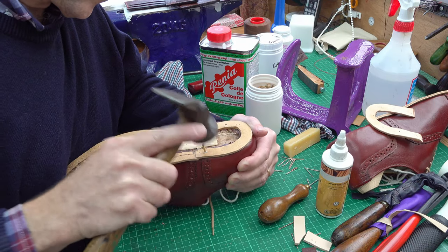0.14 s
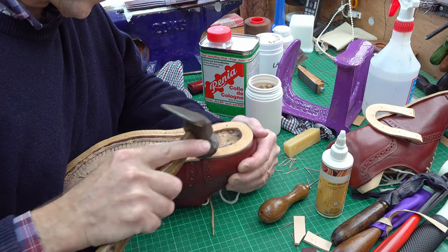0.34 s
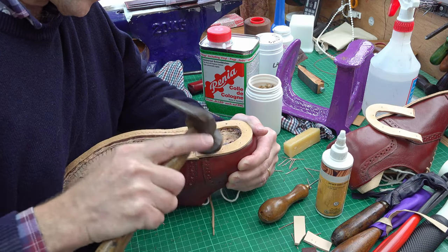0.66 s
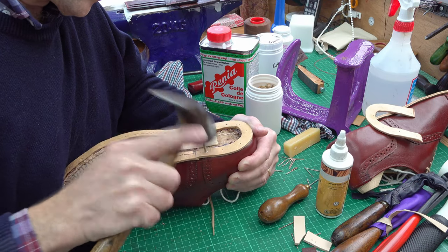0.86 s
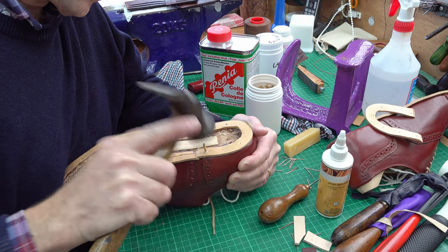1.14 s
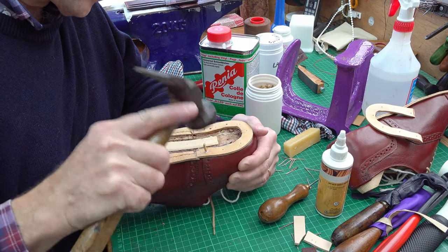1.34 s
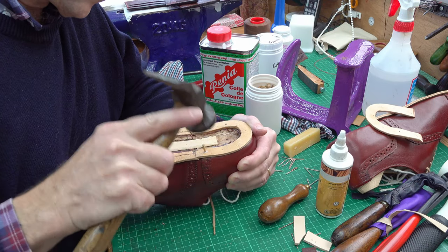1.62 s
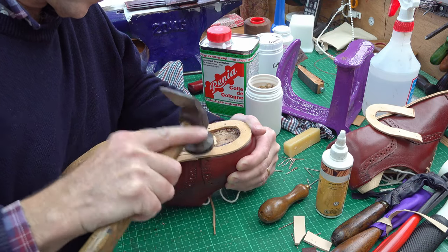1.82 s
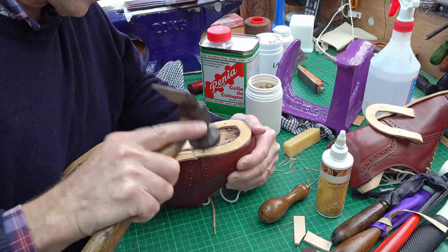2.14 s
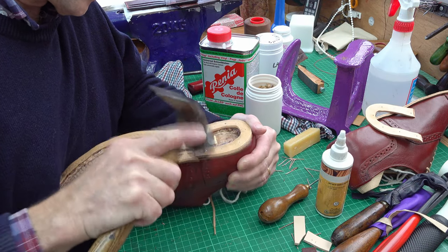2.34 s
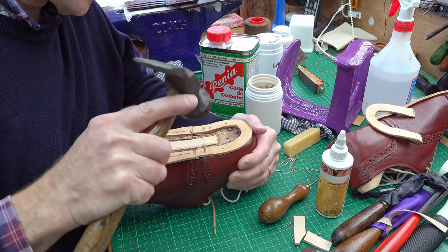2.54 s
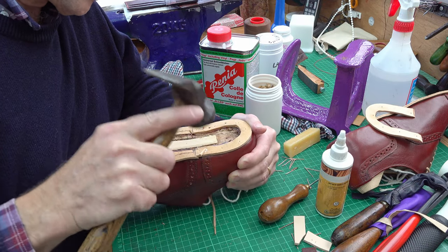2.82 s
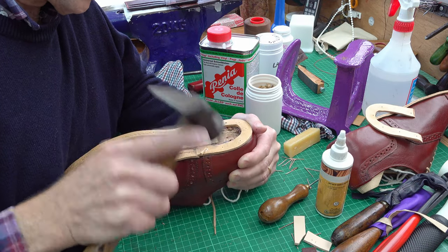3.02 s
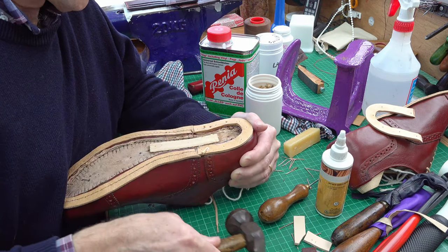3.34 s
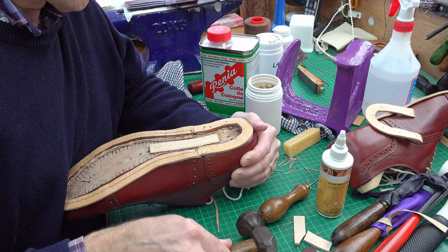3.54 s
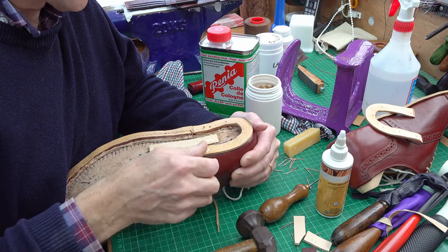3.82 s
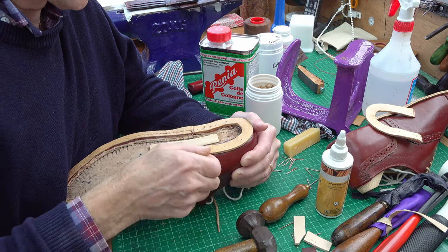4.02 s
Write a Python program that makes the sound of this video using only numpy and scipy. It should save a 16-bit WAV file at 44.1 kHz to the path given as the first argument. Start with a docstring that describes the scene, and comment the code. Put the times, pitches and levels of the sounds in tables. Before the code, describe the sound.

A small hammer taps a wooden peg ten times in steady rhythm, then the hammer is set down with a clattering knock in a quiet workshop.

```python
"""A low rumble and faint hiss, then a cobbler's hammer taps a wooden peg ten times into a shoe sole on a workbench.
Each blow is a filtered impulse (crack) with damped modes of peg, sole, bench and steel head; a small workshop answers
with decaying noise. The shoe creaks in the hands: runs of stick-slip snaps. The hammer is laid on the bench: damped
modes of mat, handle and steel knock and clink. Peaks beyond the input's ceiling are flattened, the treble softened."""
import sys
import numpy as np
from scipy import signal
from scipy.fft import rfft, irfft
from scipy.io import wavfile

SR = 44100
rng = np.random.default_rng(int(sys.argv[2]) if len(sys.argv) > 2 else 0)


def master(y):
    """Save y as 16-bit WAV."""
    cut = np.clip(np.atleast_2d(y).T, -1, 1)
    pcm = np.round(cut * 32767)  # scale
    wavfile.write(sys.argv[1], SR, pcm.astype(np.int16))


N = 183730
T = np.arange(int(.9 * SR)) / SR  # time axis of a single sound (s)

# boom modes of the bench: (f/Hz, level/dB, t60/s)
BENCH_BOOM_MODES = [(89, -25.5, 0.14), (93, -7.5, 0.17), (136.2, -4.5, 0.08), (156.64, -18, 0.21)]
# spectral shape of a small contact snap: (f/Hz, relative level/dB)
TICK_SPECTRUM = [(100, -2.5), (700, -3), (2000, -11.5), (3800, -2.5), (5500, -14.5), (9000, -18.5),
                 (12000, -29), (16000, -43)]


def gain_of(db):
    """Level definition: 20 dB is a factor of ten in amplitude."""
    return 10 ** (np.asarray(db) / 20)


def read(points, hz):
    """Interpolation: a table joined by straight lines over log frequency."""
    f, value = np.transpose(points)
    return np.interp(np.log(hz + 1), np.log(f), value)


def add(mix, s, sound):
    """Superposition: a sound is summed into the mix from time s (s)."""
    part = mix[max(round(s * SR), 0):][:len(sound)]
    part += sound[:len(part)]


def ring(modes, rise, scatter=0.):
    """Modal synthesis: damped sines build up over rise (s); scatter (dB) varies their levels per call."""
    shares = gain_of(scatter * rng.standard_normal(len(modes)))
    waves = 0
    for share, (hz, db, t60) in zip(shares, modes):
        envelope = gain_of(db - 60 * T / t60)
        waves = waves + share * envelope * np.sin(2 * np.pi * hz * T)
    return waves * (1 - np.exp(-(T / rise) ** 2))


def click(spectrum):
    """Minimum phase: the causal pulse that delivers this spectrum soonest, scaled to peak 1."""
    size = 2048
    hz = abs(np.fft.fftfreq(size, 1 / SR))
    log_gain = np.log(gain_of(read(spectrum, hz)))
    # the Hilbert transform of the log gain is the minimum phase
    pulse = np.fft.ifft(np.exp(np.conj(signal.hilbert(log_gain)))).real
    return np.pad(pulse / abs(pulse).max(), (0, len(T) - size))


def snap(spectrum, decay_s, grit):
    """Impulse and fracture noise: a click, then a crush of fibres of size grit against the click."""
    crush = rng.standard_normal(len(T)) * np.exp(-T / decay_s)
    crush[0] = 0
    crush /= np.linalg.norm(crush)
    pulse = click(spectrum)
    return pulse + grit * signal.fftconvolve(crush, pulse)[:len(T)]


def echoed(direct, echoes, dull_hz=1100):
    """Early reflection: delayed copies, dulled by the clutter on the bench, follow the direct sound."""
    out = direct.copy()
    dull = signal.lfilter(*signal.butter(2, dull_hz, fs=SR), direct)
    for delay, gain in echoes:
        add(out, delay, gain * dull)
    return out


def tail(spectrum, rise):
    """Reverberation: dense noise of energy 1 whose bands each decay exponentially at their own speed."""
    # decay of the workshop: (f/Hz, t60/s)
    workshop_t60 = [(100, .22), (400, .18), (1000, .165), (4000, .19), (8000, .185), (16000, .18)]
    hz, t, bands = signal.stft(rng.choice([-1., 1.], len(T)), SR, nperseg=256)
    decay_db = 60 * t / read(workshop_t60, hz)[:, None]
    bands = bands * gain_of(read(spectrum, hz)[:, None] - decay_db)
    wave = signal.istft(bands, SR, nperseg=256)[1][:len(T)]
    wave = wave * (1 - np.exp(-(T / rise) ** 2))
    return wave / np.linalg.norm(wave)


def room_tone(level_db=-54):
    """Coloured noise: white noise shaped into the low rumble and faint hiss of the quiet workshop."""
    # spectral shape of the background: (f/Hz, relative level/dB)
    background_spectrum = [(20, -3), (38, -2), (70, -9), (150, -16.5), (300, -20), (600, -31.5),
                           (1500, -36.5), (3000, -41), (4000, -39), (6000, -47), (16000, -48)]
    gains = gain_of(read(background_spectrum, np.fft.rfftfreq(N, 1 / SR)))
    noise = irfft(rfft(rng.standard_normal(N)) * gains, N)
    return gain_of(level_db) * noise / noise.std()


def bench_top(t60=0.16, detune=.012, scatter_db=2.5):
    """Plate modes, all damped alike: each grip detunes them (share), and their paths to the microphone differ."""
    # modes of the bench top before detuning and scatter: (f/Hz, level/dB)
    top_modes = [(261, -16), (339, -19), (385, -19), (480, -20), (540, -23), (565, -23), (608, -21),
                 (641, -23), (688, -23), (717, -27), (767, -24), (851, -27), (873, -23), (898, -23),
                 (939, -24), (1040, -26), (1093, -27), (1191, -29), (1249, -28)]
    out = np.zeros(len(T))
    for hz, db in top_modes:
        mode = (hz * (1 + detune * rng.standard_normal()), db, t60)
        add(out, rng.uniform(0.0022, 0.0068), ring([mode], rise=0.011, scatter=scatter_db))
    return out


def rattle(count=16, low_hz=885, high_hz=4724, base_db=-29.5, tilt_db=-6, t60=0.12):
    """Sympathetic excitation: loose tools ring briefly at random pitches, weaker by the tilt (dB/octave)."""
    out = np.zeros(len(T))
    for place, lag, size in rng.random((count, 3)):
        hz = low_hz * (high_hz / low_hz) ** place
        db = base_db + tilt_db * np.log2(hz / low_hz) + 6 * size
        add(out, .004 + 0.022 * lag, ring([(hz, db, t60)], rise=0.006))
    return out


def hammering(crack_db=0, grit=0.97, crush_s=0.00058, room_db=8, top_db=-1.5, sole_lag_s=0.00098,
              bench_lag_s=.005, radiate_hz=240, force_db=-0.16):
    """Impact and momentum transfer: steel meets the peg, the sole gives a moment later, then the bench."""
    # hammer blows: (t/s, push into the bench/dB, low ring of the head/dB, high ring/dB)
    blows = [(.0877, 2, -56, -56.5), (.3662, -1, -59.5, -40), (.6491, 1.5, -45.5, -45),
             (.9288, 1.5, -59, -48.5), (1.2198, 1.5, -58.5, -44), (1.5164, 3, -61.5, -54),
             (1.8091, 3, -50.5, -51), (2.1023, 1, -50, -53.5), (2.3967, -0.5, -53.5, -53.5),
             (2.7025, -4.5, -42, -52)]
    # damped modes of peg, sole, swaying bench and steel head: (f/Hz, level/dB, t60/s)
    peg_modes = [(1500, -1.5, .005), (2063, 2.5, 0.0043), (3650, -3, 0.0056), (5204, -8, 0.0071)]
    sole_modes = [(333, 9, 0.0071), (510, 7.5, 0.007), (940, 11.5, 0.0032)]
    sway_modes = [(26.5, -28, 1), (33.5, -25, 1), (64.5, -27, .6), (153, -45, .9)]
    head_low_mode = [(6910, 0, .4)]
    head_high_mode = [(10790, 0, .17)]
    # spectral shapes of the crack and of the workshop's reflections: (f/Hz, relative level/dB)
    crack_spectrum = [(100, -19.5), (600, -12.5), (2000, -2.5), (2800, 0.5), (4500, 0.5), (6500, -4.5),
                      (10000, -8), (16000, -5.5)]
    room_spectrum = [(60, -25), (200, -5.5), (400, 8), (1000, -1), (1450, -5), (2000, -8.5), (2800, -12),
                     (4000, -7.5), (5200, -16), (6800, -23), (11000, -29.5), (16000, -37.5)]
    # nearby surfaces: (delay/s, gain)
    surfaces = [(.0062, 0.045), (0.0108, 0.083), (0.0154, 0.18), (0.0256, 0.21)]
    # the contact hardens as the peg seats: first blow (dB), step with each blow (dB)
    loose_db, seating_db = -4, 0.97
    # dB of crack, and of bench top and reflections, for each dB of push
    crack_per_push, top_per_push = .55, .25
    # the face chatters once on the peg: delay (s), level (dB)
    chatter_s, chatter_db = .0021, -5.5
    new_reflections = .55  # gain of each blow's own reflections against the constant ones

    out = np.zeros(N)
    same_room = tail(room_spectrum, rise=0.0059)
    for done, (s, push_db, low_db, high_db) in enumerate(blows):
        hard_db = loose_db + seating_db * done
        peg = ring(peg_modes, rise=.00006, scatter=1.5)
        crack = gain_of(crack_db + crack_per_push * push_db) * snap(crack_spectrum, crush_s, grit)
        direct = -crack - gain_of(hard_db) * peg
        add(direct, chatter_s, -gain_of(chatter_db) * crack)
        add(direct, sole_lag_s, ring(sole_modes, rise=0.00053, scatter=.6))
        # a shoe is too small to radiate bass
        direct = signal.lfilter(*signal.butter(2, radiate_hz, "high", fs=SR), direct)
        blow = echoed(direct, surfaces)
        blow += gain_of(top_db + top_per_push * push_db) * bench_top()

        # hand and shoe shift a little between blows, and the reflections with them
        reflections = same_room + new_reflections * tail(room_spectrum, rise=.005)
        answer = gain_of(room_db) * reflections + rattle()
        blow += gain_of(hard_db / 2 + top_per_push * push_db) * answer

        bench = ring(BENCH_BOOM_MODES, rise=0.0051, scatter=0.27) + ring(sway_modes, rise=0.039)
        add(blow, bench_lag_s, gain_of(push_db) * bench)
        # the steel head sings on, more or less with each landing
        head = gain_of(low_db) * ring(head_low_mode, rise=0.0013)
        head += gain_of(high_db) * ring(head_high_mode, rise=0.00092)
        add(out, s, gain_of(force_db) * blow + head)
    return out


def handling(level_db=-11, room_db=0, grit=0.89, uneven_db=6.5, slip_gap_s=.013, slip_decay_s=.003):
    """Stick-slip friction: leather slips in the grip in runs, each slip a short cluster of tiny snaps."""
    # creaks of the shoe in the hands: (t/s, length/s, relative level/dB)
    creaks = [(2.993, .004, -35), (3.103, .02, -28.5), (3.1825, .036, -27), (3.2292, .004, -16.5),
              (3.296, .004, -18.5), (3.927, .02, -38)]
    out = np.zeros(N)
    for s, length, db in creaks:
        for at in np.arange(s, s + length, slip_gap_s):
            size = gain_of(level_db + db + uneven_db * rng.standard_normal())
            slip = snap(TICK_SPECTRUM, slip_decay_s, grit)
            slip += gain_of(room_db) * tail(TICK_SPECTRUM, rise=0.013)
            add(out, at, size * slip)
    return out


def laying_down(tick_db=-0.5, tick_room_db=-2, body_room_db=4, clink_room_db=-2, crush_s=0.00039, grit=0.74):
    """Repeated impact: handle and head drop on the cutting mat and bounce, exciting the modes of each body."""
    # knocks: (t/s, thud on the mat/dB, clack of the handle/dB, clink of steel/dB)
    knocks = [(3.3773, -1, -6, -22.5), (3.4230, -8.5, -16.5, -38), (3.4458, -19.5, -28, -39),
              (3.5325, -12, -12, -7), (3.5779, -9.5, 4, -21), (3.636, -17.5, -19, -30.5),
              (3.6592, -22.5, -16.5, -57)]
    # damped modes of mat, handle and steel head: (f/Hz, level/dB, t60/s)
    mat_modes = [(189, -0.5, 0.021), (266, 9.5, 0.025), (290, 13, 0.0057), (419, -16.5, 0.18),
                 (723, -22.5, 0.042), (1125, -21.5, 0.055)]
    handle_modes = [(266, -3.5, 0.03), (463.4, -24.5, 0.15), (521, -18.5, 0.05), (623, -23.5, 0.12),
                    (758, -44, 0.074), (1010, -26.5, 0.095), (1450, -4.5, 0.0067)]
    steel_modes = [(2003, -28, 0.054), (2566, -14.5, 0.037), (2830, -12.5, 0.036), (3240, -24, .04),
                   (3440, -25, 0.13), (4070, -19, .1), (4880, -30.5, 0.049), (5373, -36.5, 0.16),
                   (7100, -28.5, 0.099), (7267, -37, 0.039), (7908, -36, 0.084), (8818, -46, .11),
                   (10040, -33.5, 0.078), (10000, -42, .05)]
    # surfaces near the spot where the hammer is laid: (delay/s, gain)
    mat_surfaces = [(0.011, 0.18), (0.0214, 0.22)]
    # reflections of the dull wooden knocks and of the steel clink: (f/Hz, relative level/dB)
    knock_room = [(60, 12), (250, -2), (500, 26), (1000, 5), (2000, 3.5), (4000, -16), (8000, -49),
                  (16000, -50)]
    clink_room = [(500, -11), (1900, 13), (2800, 4), (4100, -3), (5800, 5), (7000, -16), (10300, -37),
                  (11500, -36), (16000, -20)]
    # the bench booms under the padded thud and under the heavy head (dB against each)
    thud_boom_db, head_boom_db = -23, -5
    # the more steel in a knock, the sharper its contact: dB of tick for each dB of clink
    tick_per_clink = 0.52

    out = np.zeros(N)
    for s, thud_db, clack_db, clink_db in knocks:
        thud = -gain_of(thud_db) * echoed(ring(mat_modes, rise=0.0025), mat_surfaces)
        boom_gain = gain_of(thud_db + thud_boom_db) + gain_of(clink_db + head_boom_db)
        boom = boom_gain * ring(BENCH_BOOM_MODES, rise=.002)

        clack = ring(handle_modes, rise=0.0011, scatter=0.38)
        clack += gain_of(body_room_db) * tail(knock_room, rise=0.0016)
        clink = ring(steel_modes, rise=.0001)
        clink += gain_of(clink_room_db) * tail(clink_room, rise=.004)

        contact = snap(TICK_SPECTRUM, crush_s, grit)
        contact += gain_of(tick_room_db) * tail(TICK_SPECTRUM, rise=0.0024)
        contact *= gain_of(tick_db + tick_per_clink * clink_db)
        add(out, s, thud + boom + gain_of(clack_db) * clack + gain_of(clink_db) * clink + contact)
    return out


def scene():
    """Superposition: all sources sum at one microphone."""
    return (room_tone() + hammering() + handling() + laying_down())[None]


def record(dry, ceiling=.96, roll_off_hz=11900, edge_hz=15950):
    """Clipping and band limiting: the input flattens peaks, softens the top, then cuts above the edge."""
    clipped = np.clip(dry, -ceiling, ceiling)
    softened = signal.lfilter(*signal.butter(1, roll_off_hz, fs=SR), clipped)
    band_limit = signal.firwin(301, edge_hz, window=("kaiser", 8), fs=SR)
    return signal.oaconvolve(softened, band_limit[None], "same")


dry = scene()
out = record(dry)
master(out)
```